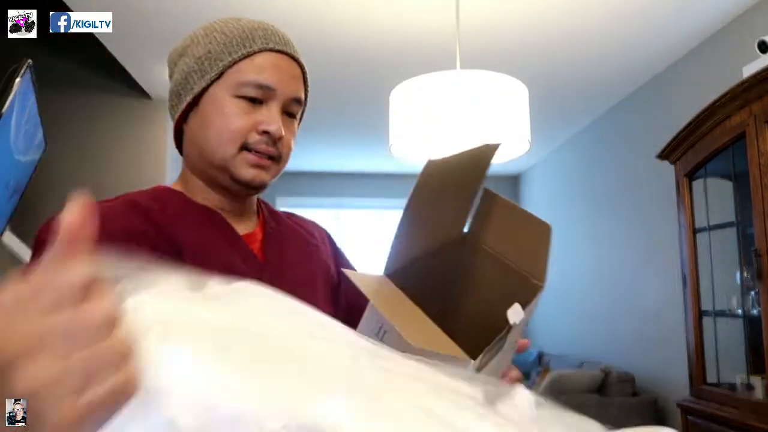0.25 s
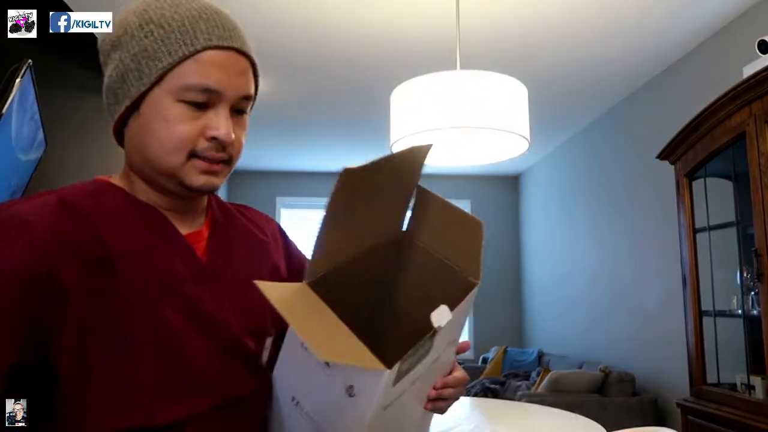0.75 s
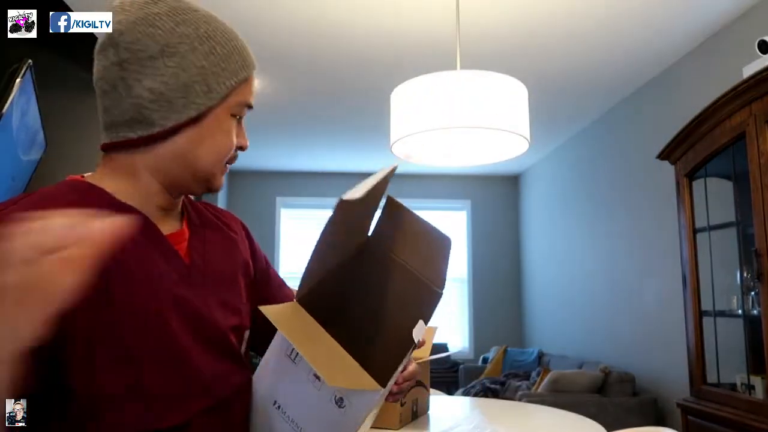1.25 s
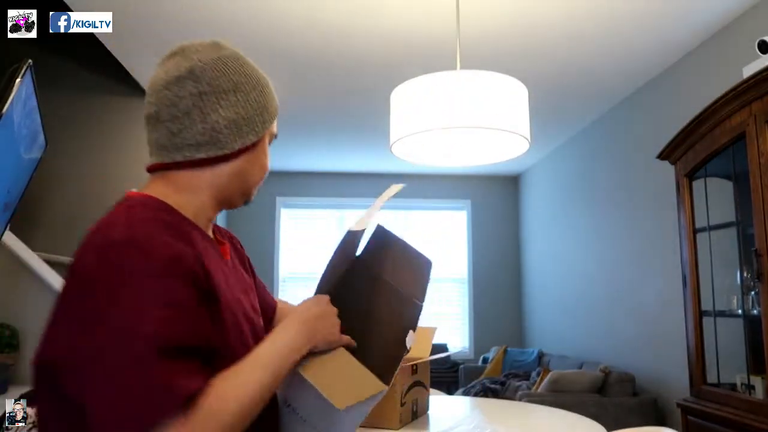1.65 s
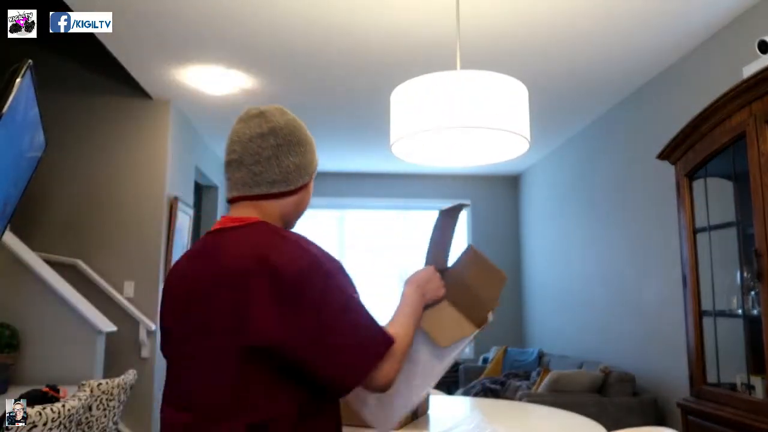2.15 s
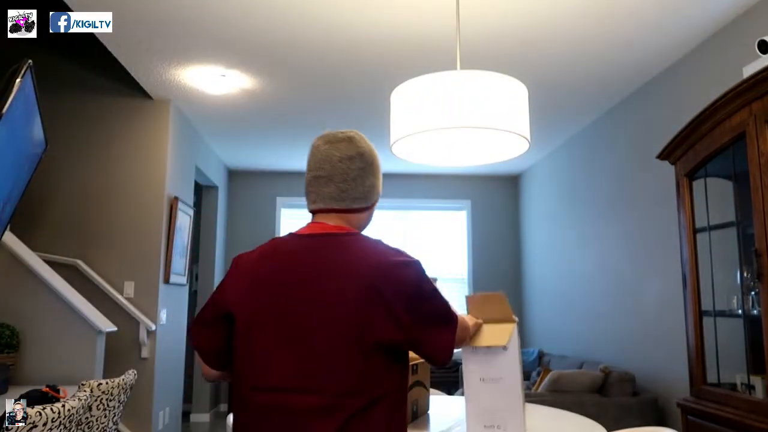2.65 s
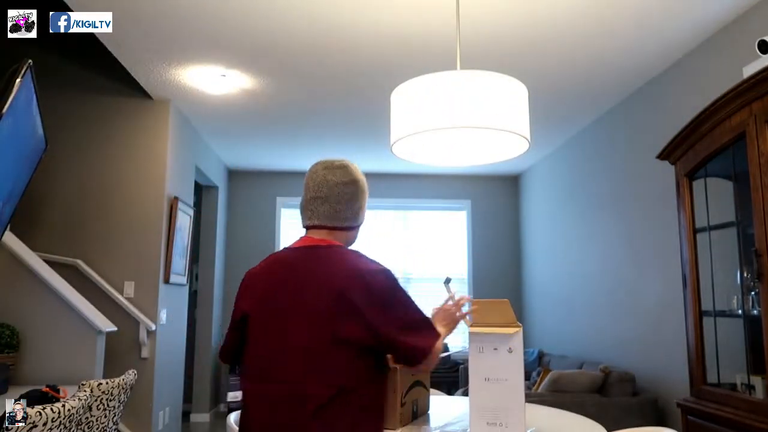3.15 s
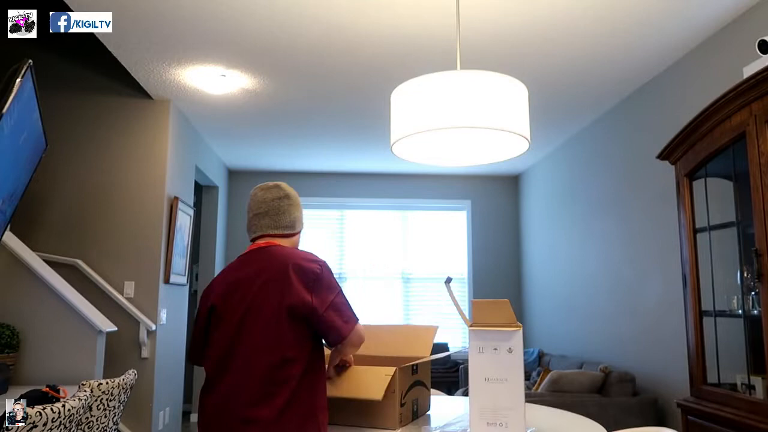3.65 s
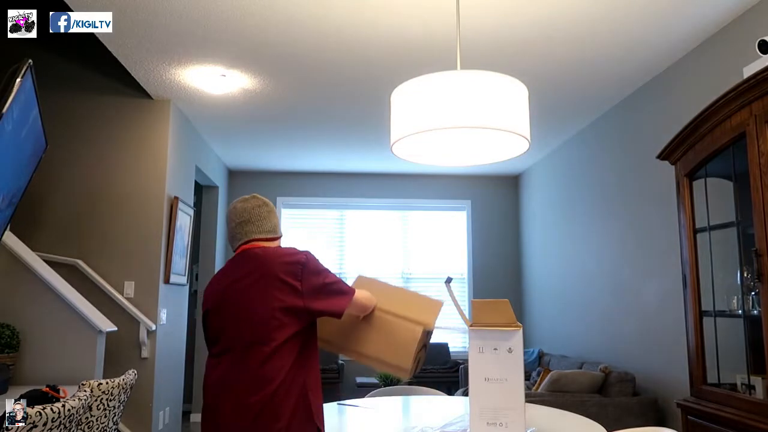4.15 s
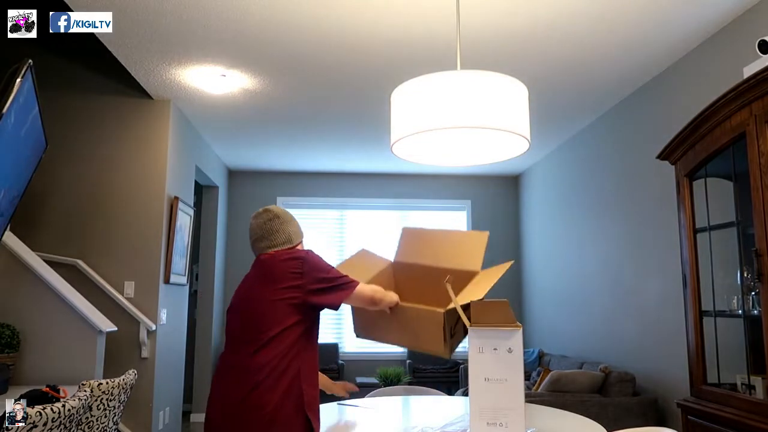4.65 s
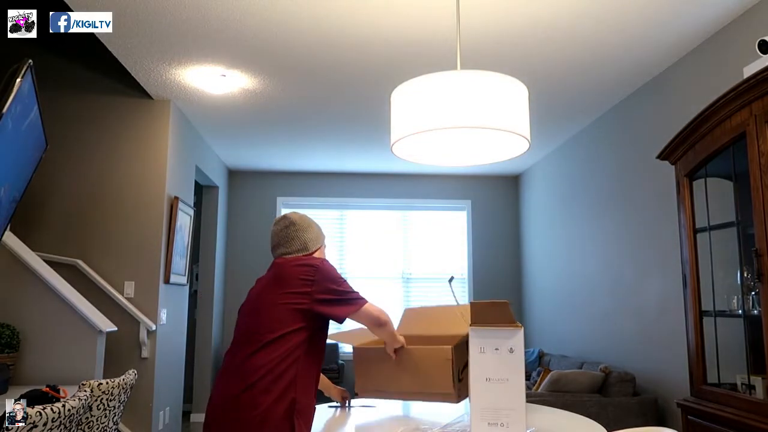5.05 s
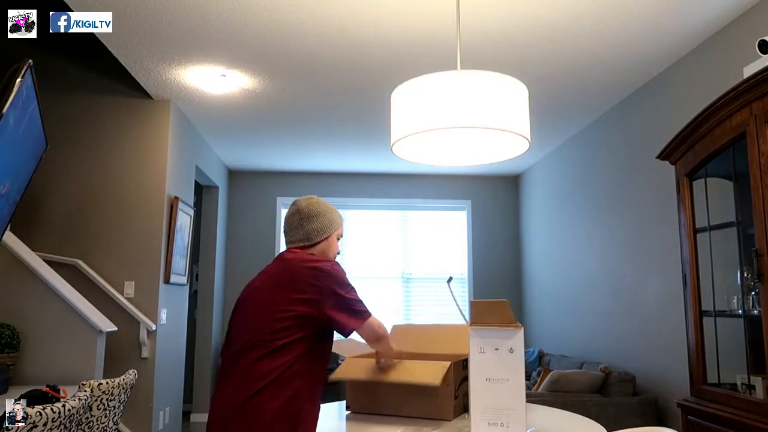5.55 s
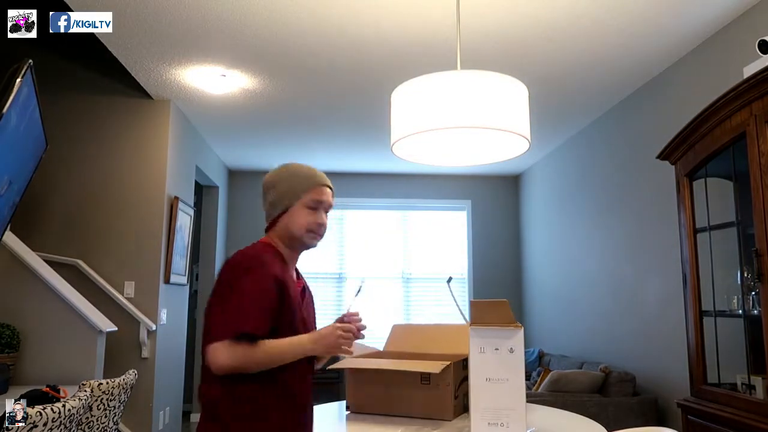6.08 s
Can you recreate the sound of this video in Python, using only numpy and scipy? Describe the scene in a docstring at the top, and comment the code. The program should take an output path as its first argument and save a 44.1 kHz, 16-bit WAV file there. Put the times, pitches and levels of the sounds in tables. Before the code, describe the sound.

Plastic-wrapped pillow crackles down onto a close table, then cardboard boxes scrape, rustle and land with hollow thuds farther off in a live room.

```python
"""Pillow and boxes in a living room

A plastic-wrapped pillow is laid down close by; two cardboard boxes are carried, set on a table and
turned over further off. Blows ring decaying modes; film and card rustle as dense shaped clicks,
creases snap as short sines, rubbed walls drum, edges squeak as gliding noise, steps shake the floor.
A live room adds tails; two close microphone ports hear the treble mostly as a left-right difference."""
import sys
import numpy as np
from scipy import signal
from scipy.fft import rfft, irfft
from scipy.io import wavfile

SR = 44100
rng = np.random.default_rng(int(sys.argv[2]) if len(sys.argv) > 2 else 0)


def to_wav(sig):
    """Store sig (one row per channel, or 1-D mono) as 16-bit WAV at the path in sys.argv[1].

    Samples outside -1..1 are clipped; the rate is SR.
    """
    pcm = np.clip(np.atleast_2d(sig), -1, 1) * 32767
    pcm = np.round(pcm).astype(np.int16)
    wavfile.write(sys.argv[1], SR, pcm.T)  # frames by channels


N = 278712
TIME_S = np.arange(N) / SR
FILM_UNTIL_S = 1.8   # the wrapped pillow is heard until then, card afterwards


def amp(db):
    """dB to gain."""
    return 10 ** (np.asarray(db) / 20)


def rms_one(x):
    """Scale to rms 1."""
    return x / np.sqrt(np.mean(x ** 2) + 1e-20)


def in_time(rows):
    """Columns of a curve table at every sample."""
    s, *columns = np.transpose(rows)
    return [np.interp(TIME_S, s, column) for column in columns]


def at_hz(points, hz):
    """Read a spectrum table on a log-frequency axis."""
    table_hz, table_value = np.array(points).T
    return np.interp(np.log(hz), np.log(table_hz), table_value)


def colour(x, points):
    """Filter x by the spectrum of the table."""
    hz = np.arange(1, N // 2 + 2) * SR / N
    return irfft(rfft(x) * amp(at_hz(points, hz)), N)


def split(x, hz):
    """Low and high part of x, each of rms 1, signed so that they add without a gap."""
    low = signal.sosfilt(signal.butter(2, hz, "low", fs=SR, output="sos"), x)
    high = signal.sosfilt(signal.butter(2, hz, "high", fs=SR, output="sos"), x)
    return rms_one(low), -rms_one(high)


def drift(rate_hz):
    """Slow random wander of rms 1: noise through two equal poles, drawn every 40 samples."""
    r = np.exp(-80 * np.pi * rate_hz / SR)
    slow = signal.lfilter([1], [1, -2 * r, r * r], rng.standard_normal(N // 40 + 2002))
    slow = slow[2000:]   # skip the settling
    return np.interp(np.arange(N) / 40, np.arange(len(slow)), rms_one(slow))


def swell(start_s, swell_s, swell_db, fade_db_per_s):
    """Level in dB about the peak: a rise through the start, then a steady fade."""
    late_s = TIME_S - start_s - swell_s
    return np.where(late_s < 0, swell_db * late_s / max(swell_s, .003), -fade_db_per_s * late_s)


def ring(clicks, hz, t60_s):
    """A two-pole resonator: a unit click sets a decaying sine ringing."""
    r, w = amp(-60 / (t60_s * SR)), 2 * np.pi * hz / SR
    return signal.lfilter([0, np.sin(w)], [1, -2 * r * np.cos(w), r * r], clicks + 1e-18)


def grains(per_s, spread_db, clump_db):
    """Clumped random clicks of uneven size; rms 1."""
    sizes = amp(spread_db * np.minimum(rng.exponential(1, N), 4)) * rng.choice([-1, 1], N)
    happens = rng.random(N) < per_s / SR
    return rms_one(sizes * happens * amp(clump_db * drift(44)))


def blows(table, modes):
    """Each blow is a short push that strikes every mode anew; hard ones favour the high modes."""
    mode_scatter, luck_db, held_damping = 0.02, 2.0, 2.9   # damping: added decay rate per octave off pitch
    contact_s = .0001
    out, length = np.zeros(N + SR), SR // 3
    t = np.arange(length) / SR
    push = t * np.exp(-t / contact_s)
    shape = (len(table), len(modes))
    lucks = rng.normal(0, luck_db, shape)
    bends = 1 + mode_scatter * rng.standard_normal(shape)   # each blow flexes the body
    for (s, peak_db, hard_db, *shift), luck, bend in zip(table, lucks, bends):
        pitch = shift[0] if shift else 1
        damping = 1 + held_damping * abs(np.log2(pitch))
        body, sign = np.zeros(length), 1
        for (hz, mode_db, t60_s), mode_luck, mode_bend in zip(modes, luck, bend):
            level_db = mode_db + mode_luck + hard_db * np.log2(hz / 300)
            body += sign * amp(level_db) * ring(push, hz * pitch * mode_bend, t60_s / damping)
            sign = -sign   # neighbouring modes start in opposite directions
        at = round(s * SR)
        out[at:at + length] += amp(peak_db) * body / np.abs(body).max()
    return out[:N]


# Knocks. Each row: start in seconds, peak in dB, hardness in dB per octave about 300 Hz,
# pitch factor (a held or tilted box rings off its free pitch).
WIDE_BLOWS = [(3.245, -32, -0.5, 0.79), (3.534, -25, -2.5, 1.14), (3.545, -29, 1, 1.12),
              (3.553, -19, -6, 1.25), (3.58, -28.5, 3, 1.03), (3.61, -30, 5, 1.23),
              (3.667, -24.5, -3.5, 1.32), (3.678, -21, -8, 0.81), (3.693, -20.5, -6, 0.81),
              (3.741, -29, -3.5, 0.73), (4.612, -34, -2, 0.89), (4.63, -29, -2, 0.85),
              (4.676, -31, 0, 1.57), (4.734, -26, -5, 0.92), (4.764, -25, -5, 0.9), (4.79, -31, -7, 0.91),
              (4.815, -32, -6, 0.8), (5.112, -29, -1, 1.25), (5.172, -32, -5, 0.88), (5.212, -33, -4, 0.86),
              (5.261, -11, -1, 0.99), (5.284, -13, 1, 0.95), (5.325, -20, 0, 1.01), (5.372, -27, -3, 1.01),
              (5.406, -11, -0.3, 1.05), (5.428, -15.5, 0.5, 0.92), (5.459, -19.5, -3, 1.0),
              (5.497, -23, -4, 1.09), (5.54, -30, -5, 1.02), (5.582, -31.5, -2, 1.02),
              (5.946, -44, 0, 1.32), (5.965, -43, 4, .9), (6.038, -40.5, 2.7, 1.11),
              (6.057, -38.5, 1, 1.05), (6.085, -37.5, -4, 0.7)]
# Box modes. Each row: free pitch in Hz, relative level in dB at zero hardness, undamped t60 in seconds.
WIDE_BOX = [(67.6, -26, 0.11), (127.6, -19, 0.25), (164, -7.5, 0.13), (205.4, 6, 0.07),
            (252.5, -4.5, 0.064), (345.4, -14.5, 0.19), (521, -7, 0.1), (632, -8.5, 0.05),
            (697, -8.5, 0.071), (850, -17, 0.08), (1177, -7.5, 0.027), (1354, -13.5, 0.034),
            (2130, -1, 0.013), (3130, -11, .008)]


def wide_box():
    """The wide card box rings at its modes, shorter when held off its free pitch."""
    return blows(WIDE_BLOWS, WIDE_BOX)


# Landing, rocking, a later tap. Each row: start in seconds, peak in dB.
NARROW_BLOWS = [(2.686, -15), (2.69, -6), (2.706, -14.5), (2.716, -15.5), (2.734, -12), (2.759, -13),
                (2.783, -21), (2.799, -15), (2.849, -23.5), (3.175, -36.5)]
# Box modes. Each row: pitch in Hz, relative level in dB at zero hardness, t60 in seconds.
NARROW_BOX = [(106, -11, 0.11), (179.7, 1, 0.1), (219.5, 6, 0.083), (265, 0, 0.11), (296, -5, 0.12),
              (388.8, 1.5, 0.13), (520, 0.5, 0.13), (568, 1.5, 0.095), (627, 0, 0.12), (690, -15, 0.06),
              (770, -10, 0.061), (1180, -18, .05), (1297, -9, 0.11), (1840, -9, 0.055)]


def narrow_box():
    """The narrow card box rings at its modes, all blows equally hard."""
    hard_db_per_octave = -0.5
    return blows([(s, db, hard_db_per_octave) for s, db in NARROW_BLOWS], NARROW_BOX)


# Pillow and hands knock the near table. Each row: start in seconds, peak in dB,
# hardness in dB per octave about 300 Hz.
NEAR_BLOWS = [(0.232, -16, 2.5), (0.355, -27.5, -1), (0.639, -25.5, -1), (0.648, -26.5, 2), (0.73, -30, 4),
              (1.005, -45, 11), (1.243, -42, -27), (1.341, -25.5, -0.5), (1.611, -44, 3), (1.669, -31, -1)]
# Table modes. Each row: pitch in Hz, relative level in dB at zero hardness, t60 in seconds.
NEAR_TABLE = [(127.4, -5, 0.3), (153.6, 0, 0.21), (181.4, 2.5, 0.13), (248, 2, 0.065), (368, 10, 0.016),
              (583, 0, 0.048), (757, -10, 0.076), (1004, 0, 0.028), (1660, -9, 0.022)]


def near_table():
    """The near table rings at its modes under the pillow and hands."""
    return blows(NEAR_BLOWS, NEAR_TABLE)


# Single snaps and ticks, loud and faint. Each row: start in seconds, peak in dB, pitch in Hz.
SNAPS = [(0.068, -27.5, 3080), (0.201, -36, 2420), (0.2125, -22, 1980), (0.24, -17, 1050),
         (0.247, -15, 1500), (0.308, -19, 2100), (0.325, -27, 1900), (0.399, -20, 2200),
         (0.4315, -14.5, 2700), (0.433, -20, 950), (0.453, -27, 1500), (0.4535, -36, 7000),
         (0.47, -18, 2410), (0.476, -22, 2350), (0.515, -22, 2300), (0.5155, -38, 6000), (0.526, -20, 2000),
         (0.553, -26, 2400), (0.563, -25, 2500), (0.601, -23, 1400), (0.627, -38, 6500), (0.639, -24, 902),
         (0.652, -36, 5500), (0.73, -32, 2000), (0.792, -30, 2500), (0.841, -36, 6000), (0.852, -28, 2100),
         (0.869, -27, 2000), (0.9, -30, 2600), (1.008, -25, 825), (1.0095, -42, 7000), (1.026, -29, 2300),
         (1.093, -32, 2800), (1.12, -30, 1710), (1.142, -30, 2400), (1.243, -31, 1500), (1.268, -32, 2000),
         (1.336, -30.5, 1120), (1.345, -30, 900), (1.473, -30, 2520), (1.615, -33, 2130),
         (1.632, -33, 2600), (1.695, -42, 10000), (1.72, -47, 13000), (1.727, -29, 6000),
         (1.7275, -44, 11000), (1.722, -19, 3480), (2.267, -36, 940), (2.673, -33, 2450), (2.688, -15, 795),
         (2.849, -32, 1920), (3.181, -26, 987), (3.54, -27, 1370), (3.562, -30, 2600), (4.312, -39, 2020),
         (4.778, -23, 1450), (4.91, -26, 1400), (5.041, -24, 1220), (5.087, -22, 1590), (5.168, -31, 2880),
         (5.174, -15.5, 1820), (5.18, -16.5, 2410), (5.265, -17, 910), (5.272, -15, 900),
         (5.406, -15.5, 1350), (5.515, -27.5, 1280), (5.948, -37, 1200), (5.955, -34, 1580),
         (5.97, -39, 1000), (6.041, -40, 1000), (6.052, -39, 600), (6.062, -42, 1018)]
# A box edge or flap meets a hard surface; the 225 Hz row is air pushed out as the narrow box lands. Each row:
# start in seconds, peak in dB, pitch in Hz.
EDGE_CRACKS = [(2.6927, -4, 225), (2.692, -13.5, 2880), (2.694, -16.5, 4840), (2.739, -20, 1930),
               (4.558, -26.5, 3200), (4.737, -23.5, 265), (5.411, -21.5, 2650), (5.948, -45, 420),
               (6.041, -38.5, 380)]


def snaps(rustle_db):
    """A snap swings up within a fraction of a cycle and rings a few more; small ones are random."""
    film_cycles, card_cycles = 3.4, 7.4   # cycles to fall 60 dB
    small_count, small_over_rustle_db, small_spread_db = 70, 6, 12
    low_hz, high_hz = 910, 3210
    small = []
    for when, level, pitch in rng.random((small_count, 3)):
        db = rustle_db[int(when * N)] + small_over_rustle_db + small_spread_db * (level - .5)
        small.append((when * N / SR, db, low_hz * (high_hz / low_hz) ** pitch))
    out, t = np.zeros(N + SR), np.arange(SR // 50) / SR
    for s, db, hz in list(SNAPS) + list(EDGE_CRACKS) + small:
        at = round(s * SR)
        cycles = film_cycles if s < FILM_UNTIL_S else card_cycles
        swing = np.minimum(t * hz / 0.56, 1) * amp(-60 * t * hz / cycles)
        out[at:at + len(t)] += amp(db) * np.sin(2 * np.pi * hz * t) * swing / swing.max()
    return out[:N]


# Steady creasing under the grips. Each row: time in seconds, rustle body in dB,
# crispness (treble over body) in dB.
CREASING = [(0.0, -51, -3.5), (0.19, -55, 6.5), (0.35, -42.5, -6), (0.7, -42.5, -6), (0.88, -47.5, -7),
            (0.96, -49, -13), (1.12, -46.5, -9), (1.45, -55, -9.5), (1.6, -55.5, 3.5), (1.9, -52, -6),
            (2.16, -60, -7), (3.11, -57.5, -10), (3.26, -47.5, -12), (3.5, -50.5, -4.5), (3.7, -43, -4.5),
            (3.91, -54, 2), (4.14, -50, -6), (4.24, -58, -10.5), (4.6, -59.5, -3.5), (4.75, -39, -6.5),
            (5.2, -40.5, -39), (5.5, -63, -23), (5.65, -64, -6), (6.32, -57.5, -2)]
# Film or card gripped and crushed. Each row: start in seconds, swell in seconds,
# peak rustle body in dB, crispness in dB.
GRIPS = [(0.205, 0.008, -37, -8), (0.218, 0.028, -23.5, -7.5), (0.29, 0.0095, -33.5, -6),
         (0.375, 0.03, -39.5, -2), (0.425, 0.011, -43, 0.5), (0.62, 0.021, -41, -2.5),
         (0.76, 0.063, -39.5, -8.5), (0.98, 0.045, -41.5, -5), (1.07, 0.019, -44, -2),
         (1.21, 0.032, -42, -18), (1.326, 0.013, -40, -21), (1.58, 0.051, -46.5, 0.5),
         (1.701, 0.024, -39, -0.5), (2.255, 0.019, -47, -6), (2.32, 0.024, -49.5, -9),
         (2.65, 0.029, -36.5, -0.5), (2.685, 0.011, -28.5, -20), (3.165, 0.012, -42, -15.5),
         (3.24, 0.036, -50.5, -6.5), (3.53, 0.034, -35, -7.5), (4.545, 0.008, -47, -1),
         (4.61, 0.025, -38.5, -23), (4.68, 0.066, -35.5, -15), (4.86, 0.038, -35, -14),
         (5.06, 0.029, -40, -9.5), (5.159, 0.007, -33, -26), (5.252, 0.023, -29, -27),
         (5.391, 0.021, -31.5, -13.5), (5.93, 0.022, -47.5, -31), (6.03, 0.012, -53.5, -25)]


def handling():
    """Grips add their power to the steady creasing; returns rustle level and crispness in dB."""
    swell_db, film_fade_db_per_s, card_fade_db_per_s = 20, 157, 115.5   # film springs back faster
    level_db, crisp_db = in_time(CREASING)
    body, top = amp(2 * level_db), amp(2 * (level_db + crisp_db))   # powers
    for s, swell_s, db, own_crisp_db in GRIPS:
        fade = film_fade_db_per_s if s < FILM_UNTIL_S else card_fade_db_per_s
        power = amp(2 * (db + swell(s, swell_s, swell_db, fade)))
        body = body + power
        top = top + power * amp(2 * own_crisp_db)
    return 10 * np.log10(body), 10 * np.log10(top / body)


def patchy(x, tilt_db):
    """Half-octave bands swell and sink each at its own pace, under a common tilt level above 3.4 kHz."""
    patch_db, patch_rate_hz = 1.5, 10
    octaves_over_300 = np.log2(np.arange(1, N // 2 + 2) * SR / N / 300)
    spectrum, out = rfft(x), 0
    for k in range(12):
        share = np.clip(1 - np.abs(2 * np.clip(octaves_over_300, 0, 5.5) - k), 0, 1)
        tilt_octaves = min(k / 2, 3.5) - np.log2(5)   # about 1.5 kHz
        gain_db = patch_db * drift(patch_rate_hz) + tilt_db * tilt_octaves
        out = out + irfft(spectrum * share, N) * amp(gain_db)
    return out


# Card panels that ring when scraped. Each row: pitch in Hz, width in Hz, mean relative level in dB.
CARD_PANELS = [(662, 97, 4), (970, 120, -2), (1149, 56, 1), (1302, 69, 0.5), (1526, 78, 0), (1845, 130, -5),
               (2125, 180, 0), (2360, 120, -8), (2795, 65, -14.5)]


def panels(scrape):
    """Each card panel resonates at its own pitch in the scraping and drifts in level; rms 1."""
    swing_db, swing_rate_hz = 3.0, 7.0
    out = 0
    for hz, width_hz, db in CARD_PANELS:
        t60_s = np.log(1000) / (np.pi * width_hz)
        gain = amp(db + swing_db * drift(swing_rate_hz))
        out = out + gain * rms_one(ring(scrape, hz, t60_s))
    return rms_one(out)


# Rustle spectrum. Each row: frequency in Hz, relative level in dB per Hz.
RUSTLE = [(180, -1.5), (300, 3.5), (550, 1), (750, -0.5), (1790, -2), (2560, -5), (4470, -19), (6840, -26),
          (10600, -37.5), (12700, -55.5), (15000, -52)]
# Crease size: small ones sound brighter. Each row: time in seconds, tilt in dB per octave about 1.5 kHz.
CREASE_TILT = [(0, -1.5), (0.2, 0.5), (0.3, 0), (0.42, -0.8), (0.6, 0.7), (0.72, -1), (0.85, 1), (1.0, 0.6),
               (1.3, 0.6), (1.45, 0), (1.7, -1), (2.2, 0.7), (2.67, 4), (2.72, -3.5), (2.95, 2), (3.2, 1.8),
               (3.45, 2.5), (3.56, 1.4), (3.8, 1.1), (4.2, 3), (4.56, 1.5), (4.63, -1), (4.8, 3.4),
               (4.92, 2.5), (5.05, 2.5), (5.18, 0), (5.27, 3), (5.42, 1), (5.6, -1), (5.96, 0), (6.06, 0.2),
               (6.32, -2)]
# Film over card. Each row: frequency in Hz, gain in dB.
FILM_SHEEN = [(1000, 1), (1700, -1.5), (2600, 0.5), (3800, -0.5), (6000, 0.5), (13000, -0.5)]


def rustle(level_db, crisp_db):
    """Creases buckle by the thousand; stiffer ones add treble, film crinkles brightly, card rings."""
    film_leaves_s, crinkle_db, panels_db = 0.04, -7, -6   # crinkles over creases, panels over rustle
    on_film = np.clip((FILM_UNTIL_S - TIME_S) / film_leaves_s, 0, 1)
    creases = grains(3000.0, 1.13, 1.22)
    creases = creases + on_film * amp(crinkle_db) * grains(320.0, 2.5, 3.9)   # lone sharp crinkles
    plain = rms_one(patchy(colour(creases, RUSTLE), in_time(CREASE_TILT)[0]))
    film = colour(plain, FILM_SHEEN)
    card = plain + amp(panels_db) * panels(creases)
    body, top = split(on_film * film + (1 - on_film) * card, 3880)
    return amp(level_db) * (body + amp(crisp_db) * top)


# Drumming spectrum. Each row: frequency in Hz, relative level in dB per Hz.
DRUMMING = [(29, -93), (50, -59), (86, -1), (172, 2.5), (240, 0.5), (330, -2.5), (443, -9.5), (617, -8.5),
            (774, -4), (849, -30), (1200, -22), (1560, -62.5), (2640, -120)]
# Card walls rubbed. Each row: time in seconds, level of the lower part in dB,
# tautness (upper over lower part) in dB.
RUBBING = [(0.0, -48, -9), (0.49, -59.5, 3), (0.65, -54.5, 4), (0.86, -60, 1), (1.28, -63, 5),
           (1.6, -50.5, -5.5), (1.97, -56.5, -3), (2.71, -63.5, 3), (2.85, -45, 3), (2.99, -55, 8.5),
           (3.22, -56, -15), (3.68, -41.5, -7), (4.03, -58.5, -4), (4.59, -58, -5), (4.79, -41, -2),
           (5.21, -52, 3), (5.4, -41, -11), (5.6, -44.5, -8), (5.74, -53, -15), (6.32, -62.5, -6)]


def drumming():
    """Hands and edges drag over the card and keep its walls rumbling; taut walls sound higher."""
    level_db, taut_db = in_time(RUBBING)
    low, high = split(colour(grains(2500.0, 2.9, 0.37), DRUMMING), 330)
    return amp(level_db) * (low + amp(taut_db) * high)


# Card edges that stick and slip. Each row: start in seconds, length in seconds, first pitch in Hz,
# last pitch in Hz, pole width in Hz, rms in dB before the ends are tapered.
SQUEAKS = [(2.264, 0.093, 560, 570, 14, -48), (2.272, 0.05, 810, 680, 25, -49.5),
           (3.255, 0.045, 4500, 4600, 200, -57), (3.372, 0.035, 5950, 6000, 40, -64),
           (3.41, .06, 5300, 5200, 90, -65), (3.445, 0.075, 6800, 5500, 40, -66),
           (4.178, 0.12, 180, 330, 30, -55.5), (4.652, 0.1, 5100, 5080, 730, -49),
           (4.659, 0.06, 6400, 6000, 200, -60), (4.785, 0.059, 340, 330, 12, -32),
           (4.857, 0.041, 330, 310, 18, -34), (4.85, 0.085, 640, 600, 60, -38.5),
           (4.955, .13, 290, 320, 28, -41.5), (5.09, 0.05, 3750, 3620, 90, -49),
           (5.085, 0.064, 5450, 5600, 92, -58), (5.165, 0.039, 3700, 3700, 230, -45),
           (5.168, .04, 2900, 2800, 350, -40), (4.97, .14, 1150, 1130, 54, -44),
           (5.168, 0.055, 2000, 1950, 280, -31.5), (3.571, 0.039, 1480, 1520, 59, -37.5),
           (5.185, 0.025, 1520, 1500, 57, -31), (5.224, 0.02, 1310, 1320, 41, -34),
           (5.222, 0.025, 2150, 2250, 160, -34.5), (5.3, 0.0478, 2200, 2050, 220, -34.5),
           (4.895, 0.05, 2650, 2600, 150, -43), (5.04, 0.0456, 1950, 2020, 68, -42),
           (3.563, 0.029, 3700, 3650, 80, -47)]


def squeaks():
    """Uneven slips make a narrow band of noise round a gliding pitch."""
    out = np.zeros(N)
    for s, length_s, first_hz, last_hz, width_hz, db in SQUEAKS:
        n, at = round(length_s * SR), round(s * SR)
        slips = rng.standard_normal(SR // 2) + 1j * rng.standard_normal(SR // 2)
        r = np.exp(-2 * np.pi * width_hz / SR)
        slips = signal.lfilter([1], [1, -2 * r, r * r], slips)[-n:]
        turn = np.exp(2j * np.pi * np.cumsum(np.linspace(first_hz, last_hz, n)) / SR)
        out[at:at + n] += amp(db) * rms_one((slips * turn).real) * signal.windows.tukey(n, .25)
    return out


# Feet and bumps. Each row: time of the peak in seconds, level in dB.
THUMPS = [(0.25, -51), (0.42, -59), (0.67, -59), (1.39, -61), (1.62, -45), (1.76, -45), (2.39, -56),
          (2.73, -39), (2.96, -53), (3.27, -39), (3.33, -46), (3.39, -48), (3.44, -49), (3.57, -39),
          (3.71, -51), (4.63, -45), (4.77, -35), (5.3, -43), (5.37, -37), (5.47, -36), (6.02, -61)]


def floor_shake():
    """Each thump swells and fades in the lowest bass over a faint constant hum."""
    swell_s, swell_db, fade_db_per_s, hum_db = 0.027, 17, 194, -63
    bass = signal.butter(2, [34.0, 85.0], "band", fs=SR, output="sos")
    shake = rms_one(signal.sosfilt(bass, rng.standard_normal(N)))
    gain = amp(hum_db)
    for s, db in THUMPS:
        gain = gain + amp(db + swell(s - swell_s, swell_s, swell_db, fade_db_per_s))
    return gain * shake


# Reverberation. Each row: frequency in Hz, t60 in seconds.
ROOM_T60 = [(60, 0.089), (250, 0.37), (700, 0.5), (2000, 0.59), (5000, 0.51), (12000, 1)]
# Each row: time in seconds, room over direct sound of the blows in dB.
DISTANCE = [(0, -7.5), (1.3, 3.5), (2.3, 2.5), (6.32, 5)]


def room(hits, handled):
    """Two unrelated diffuse tails, each octave dying at its own rate after a 1 ms onset."""
    handled_db, onset_s = -9.5, 0.001   # handling reaches the room less than blows
    x = amp(in_time(DISTANCE)[0]) * (hits + amp(handled_db) * handled)
    t, tails = np.arange(SR) / SR, 0
    for low_hz in 40 * 2.0 ** np.arange(9):
        edges_hz = [low_hz, min(2 * low_hz, .45 * SR)]
        band = signal.butter(2, edges_hz, "band", fs=SR, output="sos")
        noise = signal.sosfilt(band, rng.standard_normal((2, SR)))
        tails = tails + noise * amp(-60 * t / at_hz(ROOM_T60, 1.4 * low_hz))
    tails = tails * np.clip(t / onset_s, 0, 1)
    tails = tails / np.sqrt(np.sum(tails[0] ** 2))
    return signal.fftconvolve(x[None], tails, axes=1)[:, :N]


# Each row: frequency in Hz, gain of the difference of the ports over their sum in dB.
PORTS = [(60, -77), (200, -30.5), (500, -22.5), (1000, -16.5), (2000, -15), (4000, -3.5), (6000, 1),
         (9000, 8.5), (15000, 23.5)]


def port_difference(direct, wet):
    """Nearby surfaces reach the two close ports unequally; the difference grows with frequency."""
    t = np.arange(SR // 20) / SR
    early = rng.standard_normal(len(t)) * np.exp(-t / 0.014)
    gradient = signal.fftconvolve(direct, early / np.sqrt(np.sum(early ** 2)))[:N]
    return colour(amp(-2.0) * gradient + amp(-3.5) * wet, PORTS)


# Room air in the sum of the ports. Each row: frequency in Hz, relative level in dB per Hz.
AIR = [(12, -36.5), (20, 11), (266, -13), (505, -15), (686, -12), (834, -3), (1410, -13), (2090, -3.5),
       (3750, -6), (7950, -21.5), (9660, -21.5), (12400, -28), (15500, -84)]
# Room air in the difference of the ports. Each row: frequency in Hz, relative level in dB per Hz.
AIR_SIDE = [(12, -81), (20, -46), (129, -8), (382, 0), (631, -7), (3080, -15), (4070, -14.5), (12800, -36),
            (14300, -45.5), (15500, -67)]


def room_air(spectrum, rms_db):
    """Steady noise of the given spectrum."""
    return amp(rms_db) * rms_one(colour(rng.standard_normal(N), spectrum))


def whine():
    """A faint steady sine."""
    hz, rms_db = 13017, -96
    return amp(rms_db) * rms_one(np.sin(2 * np.pi * hz * TIME_S))


def scene():
    """Sum and difference of the two ports, returned as left and right."""
    rustle_db, crisp_db = handling()
    hits = wide_box() + narrow_box() + near_table() + snaps(rustle_db)
    handled = rustle(rustle_db, crisp_db) + drumming() + squeaks()
    wet = room(hits, handled)
    mid = hits + handled + wet[0] + floor_shake() + room_air(AIR, -59.5) + whine()
    side = port_difference(hits + handled, wet[1]) + room_air(AIR_SIDE, -57.5)
    return np.array([mid + side, mid - side])


def record(dry):
    """A steep low-pass cuts the top."""
    cutoff_hz = 15650
    return signal.sosfilt(signal.ellip(10, .5, 70, cutoff_hz, fs=SR, output="sos"), dry)


dry = scene()
out = record(dry)
to_wav(out)
```